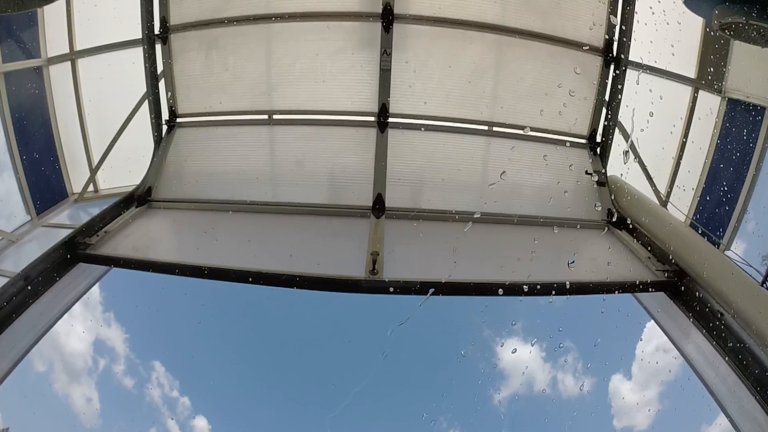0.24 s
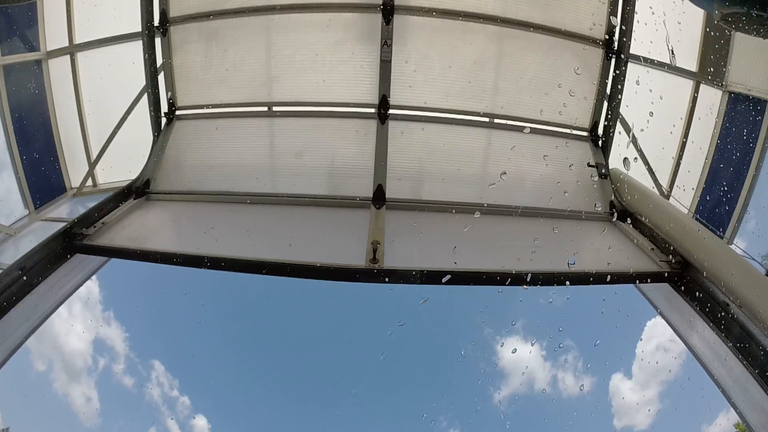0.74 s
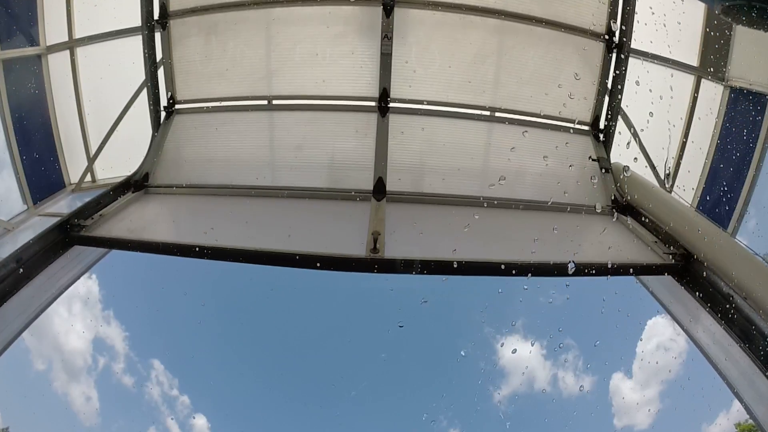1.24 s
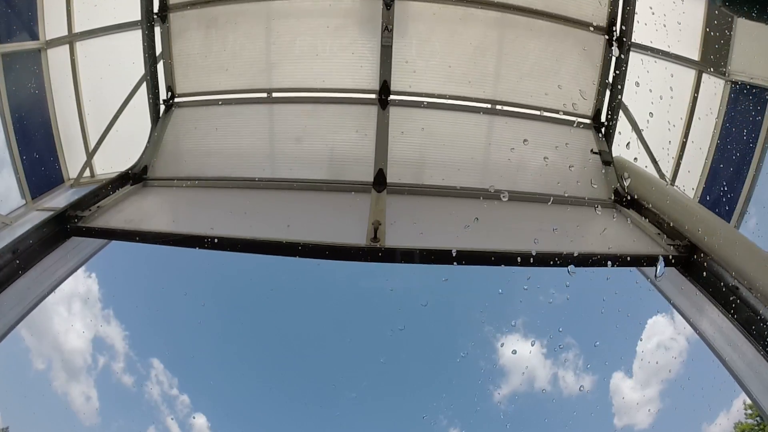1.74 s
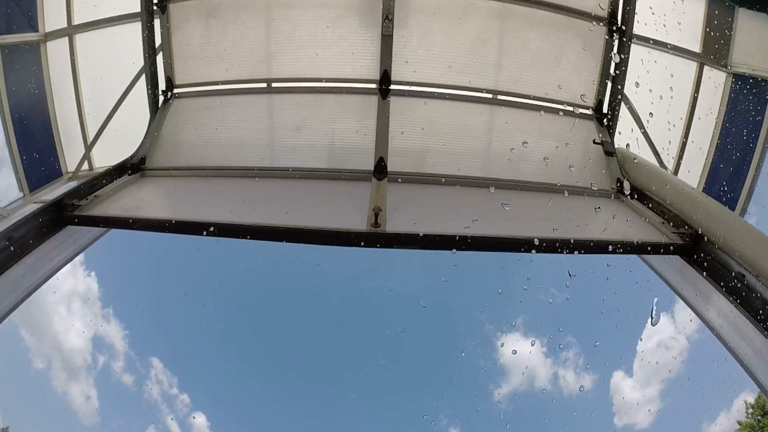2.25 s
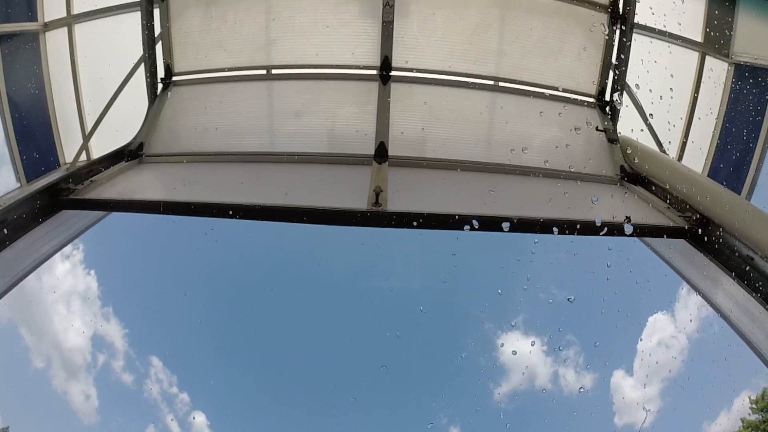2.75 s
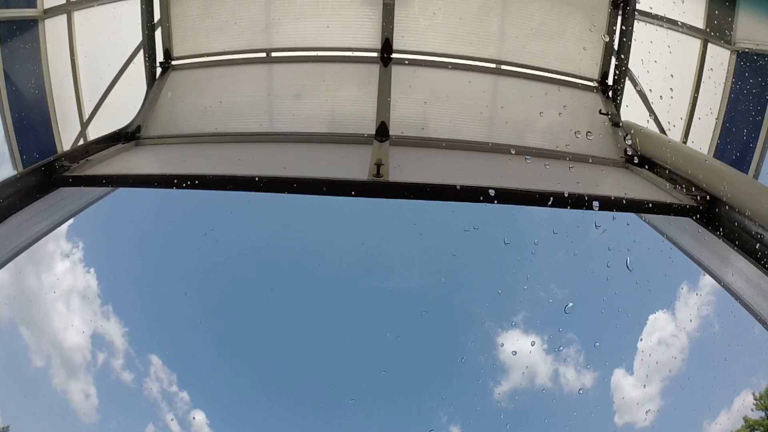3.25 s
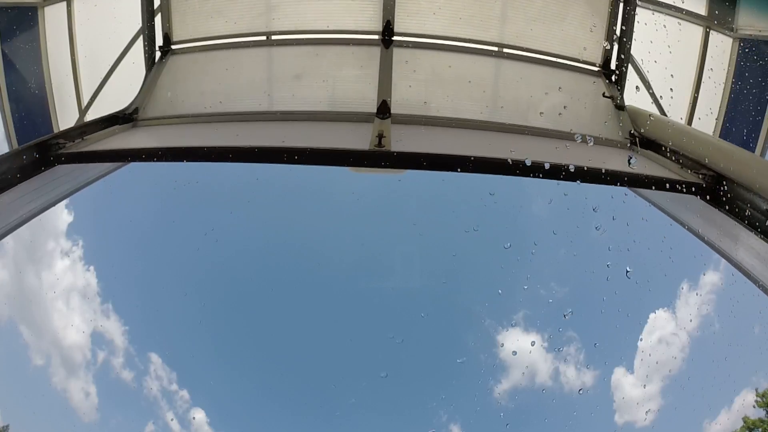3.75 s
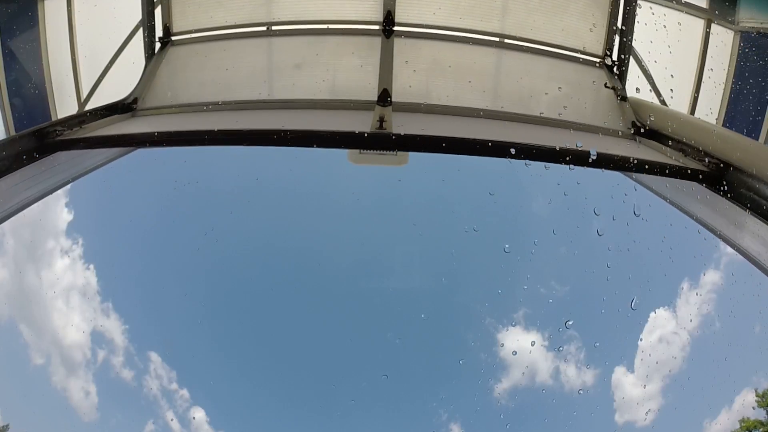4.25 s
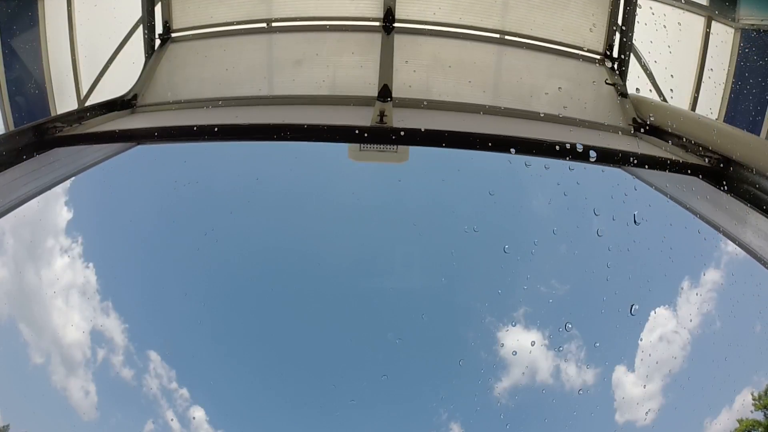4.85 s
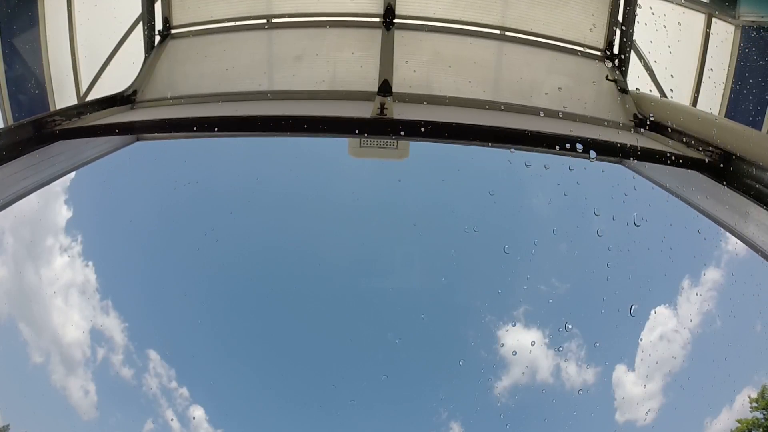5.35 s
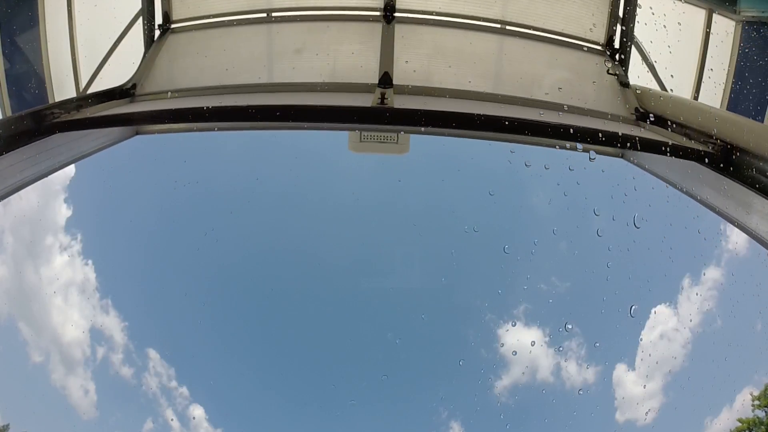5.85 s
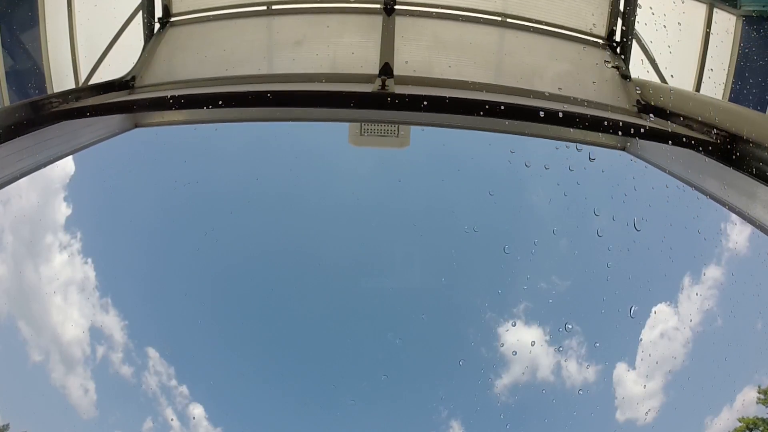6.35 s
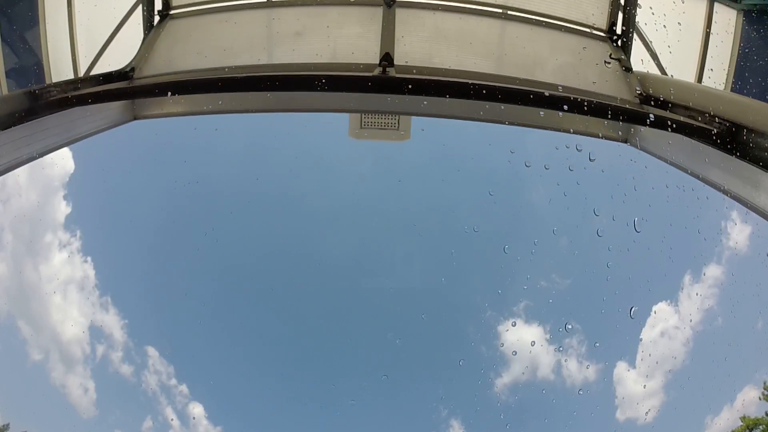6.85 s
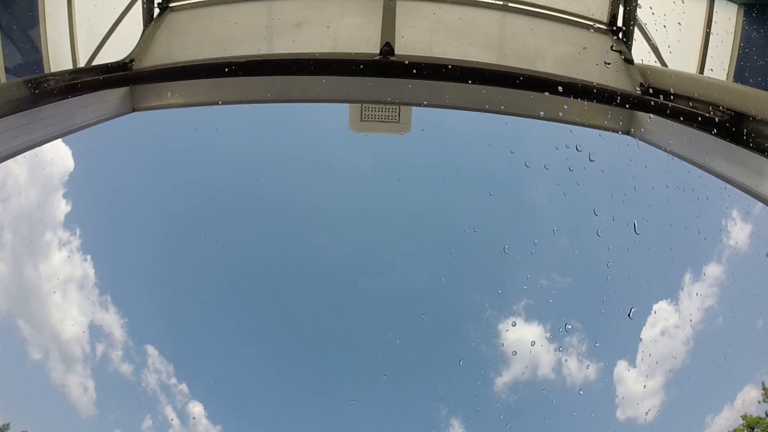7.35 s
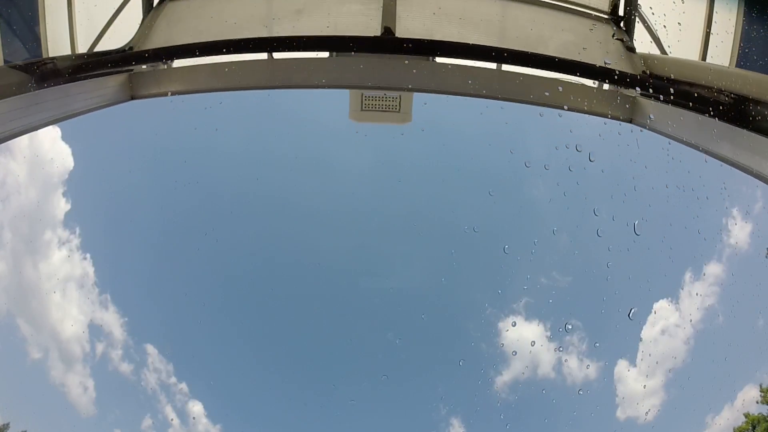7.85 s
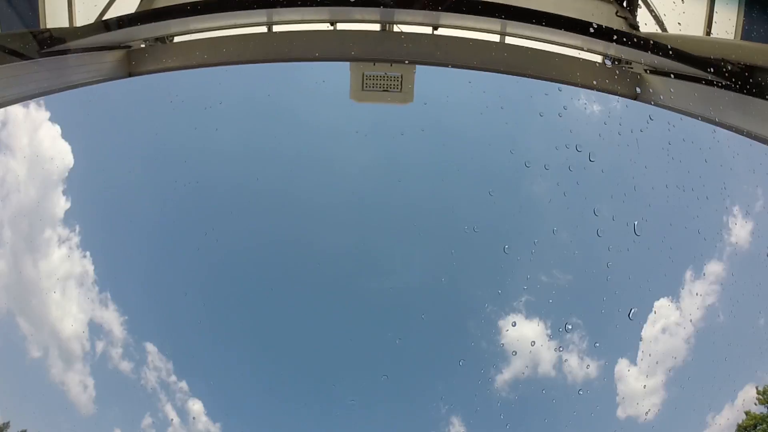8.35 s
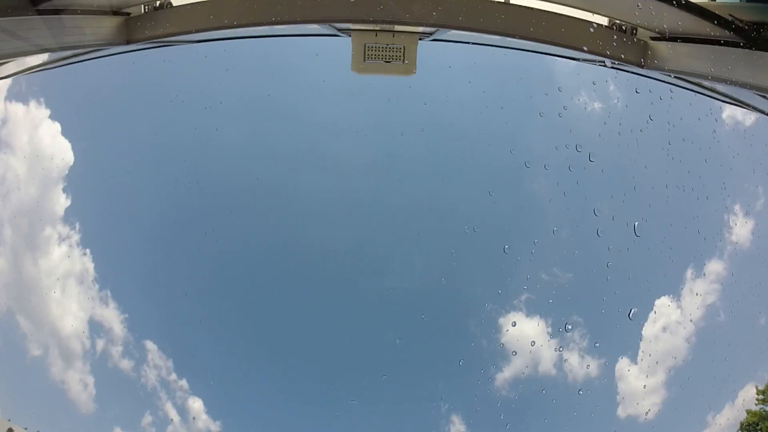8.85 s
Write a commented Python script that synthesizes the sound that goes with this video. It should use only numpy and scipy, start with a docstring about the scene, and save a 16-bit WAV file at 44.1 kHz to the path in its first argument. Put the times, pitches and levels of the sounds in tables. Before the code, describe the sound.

Muffled blower roar with deep cabin booming and a wavering mid-pitched fan hum; near the end the motor cuts, its tone sliding down as the blast fades.

```python
"""Inside a car that creeps out of a car wash under the air dryers, heard by a microphone in the cabin.
The air blast drums on the roof, buffets the body, roars and whistles at the nozzles, hisses over the glass:
shaped noise. The cabin booms on its lowest air modes, as noise ringing in three resonances.
A fan's blade tone, a few shivering partials, swells and fades as the car moves, and its nozzle whistles.
Its motor is cut: the tone sags among tunnel echoes, the blast weakens, and dryers farther off roar on."""
import sys
import numpy as np
from scipy import signal
from scipy.fft import rfft, irfft
from scipy.io import wavfile
from scipy.ndimage import uniform_filter1d

SR = 44100
rng = np.random.default_rng(int(sys.argv[2]) if len(sys.argv) > 2 else 0)


def bounce(signal):
    """Save signal as a 16-bit WAV file at the path given by the first command-line argument."""
    frames = np.transpose(np.atleast_2d(signal))
    limited = np.clip(frames, -1, 1)
    pcm = np.round(limited * 32767).astype(np.int16)
    wavfile.write(sys.argv[1], SR, pcm)


N = 401310
T = np.arange(N) / SR
HZ = np.fft.rfftfreq(N, 1 / SR)

# the near fan turns steadily until its motor is cut; air drag would then halve its speed in COAST_S
BLADE_HZ, CUT_S, COAST_S = 509.2, 6.78, 7.6


def amp(db):
    """Turns decibels into gain."""
    return 10 ** (np.asarray(db) / 20)


def evened(x):
    """Scales to rms 1."""
    return x / np.sqrt(np.mean(abs(x) ** 2) + 1e-30)


def level_curve(points):
    """Joins (time, level) points by straight lines over the whole scene."""
    times_s, levels_db = np.transpose(points)
    return np.interp(T, times_s, levels_db)


def spectrum_db(points):
    """Joins (frequency, dB) points along a log frequency axis; silent above the last point."""
    point_hz, point_db = np.transpose(points)
    return np.interp(np.log(HZ + 1), np.log(point_hz + 1), point_db, right=-np.inf)


def noise(gain):
    """Noise of rms 1 with the given gain at each frequency."""
    white = rng.standard_normal(N)
    return evened(irfft(rfft(white) * gain, N))


def drift(rate_hz):
    """Slow random wandering of rms 1, mostly below rate_hz."""
    return noise(1 / (1 + (HZ / rate_hz) ** 4))


def resonance(hz, width_hz):
    """Noise ringing in one resonance, width_hz across where its amplitude gain is half."""
    return noise(1 / (1 + (2 * (HZ - hz) / width_hz) ** 2))


def steadied(x, seconds):
    """Holds the slow level near 1 and keeps the quick flutter."""
    size = max(int(seconds * SR), 8)
    power = uniform_filter1d(uniform_filter1d(x ** 2, size), size)
    return x / np.sqrt(power + 1e-6)


def fan_speed(t):
    """Share of full speed: 1 while driven, then slowed by air drag."""
    return 1 / (1 + np.maximum(t - CUT_S, 0) / COAST_S)


def blast_level(start_db, db_per_s, swell_db, speed_power, lag_s=0):
    """Level in dB of one part of the blast, from the car's progress and the fan's speed."""
    # the blast swells briefly as the car moves through it; half length is where the swell is 1/e
    swell_s, swell_half_s = 3.34, 0.37
    swell = swell_db * np.exp(-((T - swell_s) / swell_half_s) ** 2)
    progress = db_per_s * np.minimum(T, CUT_S)
    slowing = speed_power * 20 * np.log10(fan_speed(T - lag_s))
    return start_db + progress + swell + slowing


def far_dryers(level_db=-52):
    """Dryers deeper in the tunnel: a steady roar that is left when the near fan runs down."""
    # spectrum of the distant roar: frequency_hz, relative_db (per Hz)
    far_spectrum = [(400, -10.5), (540, 1.5), (680, -0.5), (800, 0), (1000, -5), (1250, -6.5), (1600, -13),
                    (2300, -19), (3000, -32.5)]
    return amp(level_db) * noise(amp(spectrum_db(far_spectrum)))


def hollow_rumble(hz=325, width_hz=135):
    """A broad, hollow band of the buffeting, between the roof's drumming and the blade tone."""
    # level of the rumble: time_s, level_db
    rumble_levels = [(0, -38), (.6, -40.5), (2.0, -38), (2.7, -42), (3.45, -35.5), (4.0, -39), (5.65, -39),
                     (6.0, -41.5), (6.6, -44), (6.95, -37.5), (7.2, -44), (7.5, -42), (7.85, -44),
                     (9.1, -45.5)]
    return amp(level_curve(rumble_levels)) * steadied(resonance(hz, width_hz), seconds=0.27)


def cabin_boom(billow_db=0.3, billow_hz=3.3):
    """Turbulence on the body pumps the lowest air modes of the cabin; each billows on its own."""
    # air modes of the cabin (throb, boom, drone): frequency_hz, width_hz, trim_db
    air_modes = [(28.5, 7.9, 0.15), (70.7, 14, -0.5), (99.7, 11.3, 0)]
    # levels of the three modes before their trims, deepest first: time_s, level_db
    throb_levels = [(0, -47), (.68, -29.5), (.8, -23.5), (1.1, -25), (1.4, -31), (2.05, -28), (2.3, -28),
                    (2.57, -22.5), (2.85, -36), (3.1, -30), (3.3, -31), (3.55, -27.5), (3.8, -34),
                    (4.2, -27), (4.5, -36), (5.25, -30.5), (5.5, -26.5), (5.85, -33.5), (6.6, -33),
                    (6.95, -29.5), (7.8, -27.5), (8.25, -36), (8.7, -30), (9.1, -38)]
    boom_levels = [(0, -23.5), (.28, -30), (.58, -43), (.8, -24.5), (1.1, -29), (1.5, -24.5), (1.8, -26.5),
                   (2.05, -34.5), (2.3, -23.5), (2.53, -33), (2.92, -26.5), (3.2, -28.5), (3.47, -23),
                   (3.9, -35), (4.2, -35), (4.47, -22.5), (4.68, -34.5), (5.1, -22), (5.5, -28),
                   (5.75, -27.5), (6.15, -31), (6.35, -26), (6.5, -46), (6.78, -24), (7.05, -26),
                   (7.42, -24.5), (7.62, -31.5), (7.85, -24), (8.05, -37), (8.3, -32.5), (8.55, -29),
                   (9.1, -34)]
    drone_levels = [(0, -24.5), (.55, -38), (1.0, -28.5), (1.45, -32), (1.8, -28.5), (2.1, -32), (2.8, -26),
                    (3.25, -26.5), (3.7, -23.5), (4.15, -31), (4.75, -33), (5.1, -23), (5.45, -32),
                    (5.8, -25), (6.35, -32), (6.55, -27.5), (7.2, -30.5), (7.55, -41), (8.0, -33.5),
                    (9.1, -56)]
    boom = np.zeros(N)
    for (hz, width_hz, trim_db), points in zip(air_modes, (throb_levels, boom_levels, drone_levels)):
        level_db = level_curve(points) + trim_db + billow_db * drift(billow_hz)
        boom += amp(level_db) * steadied(resonance(hz, width_hz), seconds=0.3)
    return boom


def air_blast(buffet_trim_db=8.0, roar_trim_db=1.0, hiss_trim_db=1.0, gust_db=-0.3, flutter_db=0.26):
    """Jets drum on the roof, buffet the body, roar and whistle at the nozzles, and hiss over the glass."""
    # smooth spectra heard through the closed car: frequency_hz, relative_db (per Hz)
    buffet_spectrum = [(14, -40), (21, -5), (38, 7), (55, 8), (85, 6), (120, -2), (170, -5.5), (225, -3),
                       (250, -5), (280, -10.5), (360, -11.5), (400, -10), (455, -9), (490, -17),
                       (560, -25.5), (900, -57)]
    roar_spectrum = [(200, -8), (450, 1), (530, 3.5), (580, 0.1), (800, -4), (950, 0), (1250, -10),
                     (1800, -10), (2450, -16.2), (3100, -23.5), (5000, -85.5)]
    hiss_spectrum = [(1500, -19.5), (2700, -3), (3400, 3), (4800, -0.5), (5200, -7), (6200, -9),
                     (7200, -15), (9000, -22), (13000, -41.5)]
    # bands that glass and panels let through or hold back: frequency_hz, width_hz (at half the dB), gain_db
    panel_bands = [(767, 67, 4), (1210, 58, -0.5), (1410, 110, 4), (1545, 84, 4.5), (1740, 70, 3),
                   (2100, 70, -2), (2280, 210, 3.5), (2750, 90, 2), (3030, 150, -3.5), (3670, 260, 2),
                   (3980, 150, -1), (4230, 130, 1.5), (4470, 110, -5.5), (4590, 200, 4), (4800, 63, 3.5)]
    # broad modes of the roof panel: frequency_hz, width_hz, gain_db (against the drumming)
    roof_modes = [(141.7, 30, -4), (171.6, 10, -8), (196.4, 26, -9.5), (224, 14, -13.5)]
    # level of the jets' drumming on the roof: time_s, level_db
    drumming_levels = [(0, -31), (.9, -29.5), (1.4, -32), (2, -29), (2.65, -35.5), (3.15, -29.5),
                       (3.8, -29.5), (4.45, -36), (4.8, -31.5), (5.8, -33), (6.05, -36.5), (6.4, -30.5),
                       (7.15, -31), (7.35, -34.5), (7.7, -34.5), (8.3, -44), (8.7, -40), (9.1, -45)]
    # breathy nozzle whistles: frequency_hz, width_hz, gain_db (against the roar before its trim)
    nozzle_whistles = [(1045, 72, -7.5), (1099, 55, -11.5)]
    # course of each part before its trim: start_db, slope_db_per_s, swell_db, power of the fan's speed
    on_body = (-34, -0.18, -0.5, 2.5)
    at_nozzles = (-43.5, -0.2338, 1.2, 3.5)
    on_glass = (-56, -0.46, 0, 1.5)

    buffet_level = blast_level(*on_body)
    hiss_level = blast_level(*on_glass)
    # the jets at the nozzles keep their push for a moment after the cut
    roar_level = blast_level(*at_nozzles, lag_s=0.36)
    panels_db = sum(db * np.exp(-np.log(2) * (2 * (HZ - hz) / width_hz) ** 2)
                    for hz, width_hz, db in panel_bands)

    # one gust pattern moves buffeting and roar in opposite directions
    gusts = drift(rate_hz=11)
    glass_flutter = drift(rate_hz=46)

    roof = amp(level_curve(drumming_levels)) * sum(
        amp(db) * steadied(resonance(hz, width_hz), seconds=0.23) for hz, width_hz, db in roof_modes)
    body = amp(buffet_level + buffet_trim_db + gust_db * gusts) * noise(amp(spectrum_db(buffet_spectrum)))
    roar = amp(roar_level + roar_trim_db + flutter_db * gusts)
    roar = roar * noise(amp(spectrum_db(roar_spectrum) + panels_db))
    whistles = amp(roar_level) * sum(
        amp(db) * steadied(resonance(hz, width_hz), seconds=0.14) for hz, width_hz, db in nozzle_whistles)
    hiss = amp(hiss_level + hiss_trim_db + flutter_db * glass_flutter)
    hiss = hiss * noise(amp(spectrum_db(hiss_spectrum) + panels_db))
    return roof + body + roar + whistles + hiss


def fan_whistle(hz=1038, width_hz=50, wander_hz=10, level_db=-53.5, stall_speed=.925, stall_range=.015):
    """The near fan's nozzle sings a wavering note that falls with the fan and dies as the airflow weakens."""
    # moments when the whistle flares up: time_s, rise_db
    flare_moments = [(.12, 8), (.82, 7), (1.83, 8), (6.23, 12.5)]
    flare_half_s = 0.025  # to where the rise is 1/e
    speed = fan_speed(T)
    phase = 2 * np.pi * np.cumsum(hz * speed + wander_hz * drift(rate_hz=6.88)) / SR
    # two independent slow drifts make the note a narrow, breathy band
    song = drift(width_hz / 2) * np.cos(phase) + drift(width_hz / 2) * np.sin(phase)
    singing = .5 + .5 * np.tanh((speed - stall_speed) / stall_range)
    flare_db = sum(db * np.exp(-((T - s) / flare_half_s) ** 2) for s, db in flare_moments)
    return amp(level_db + flare_db) * singing * steadied(song, seconds=0.072)


def tunnel(x, t60_s, wet_db):
    """The wash tunnel rings on, so a falling tone smears and beats with its own echoes."""
    t = np.arange(2 * SR) / SR
    tail = rng.standard_normal(len(t)) * amp(-60 * t / t60_s)
    echo = signal.fftconvolve(x, tail)[:N]
    return evened(x + amp(wet_db) * steadied(evened(echo), seconds=.4))


def fan(wander_rad=0.12, rough=0.19, echo_share=0.66, apart_hz=25):
    """Blades chop uneven air: a narrow tone whose phase and strength shiver."""
    # partials of the blade tone: multiple, relative_db
    blade_partials = [(1, 0.5), (2, -21.5), (3, -28.5)]
    # the tone swells and fades as the car moves through its standing waves: time_s, level_db
    tone_levels = [(0, -38.5), (.42, -40.5), (.55, -44), (.8, -40.5), (1.22, -49), (1.8, -36.5),
                   (2.02, -39.5), (2.2, -37), (2.34, -44), (2.45, -32.5), (2.6, -33.5), (2.72, -39),
                   (2.92, -33.5), (3.04, -38.5), (3.3, -37), (3.42, -39.5), (3.62, -35), (3.73, -41.5),
                   (3.8, -38), (4.2, -38.5), (4.42, -43), (4.72, -43.5), (4.85, -37), (5.15, -37),
                   (5.3, -49), (5.5, -42), (5.82, -38), (5.97, -52), (6.12, -39), (6.35, -38.5),
                   (6.52, -39), (6.58, -49), (6.66, -39.5), (6.82, -40.5), (7.05, -46), (7.26, -40),
                   (7.5, -40), (8.2, -44), (8.58, -39.5), (8.85, -44), (9.1, -53)]
    blade_hz = BLADE_HZ * fan_speed(T)
    phase = 2 * np.pi * np.cumsum(blade_hz) / SR + wander_rad * drift(rate_hz=4.1)
    tone = evened(sum(amp(db) * np.sin(round(multiple) * phase) * (1 + rough * drift(rate_hz=10.0))
                      for multiple, db in blade_partials))
    # echoes stand apart from the direct tone only once the pitch has moved
    pitch_fall = np.minimum((BLADE_HZ - blade_hz) / apart_hz, 1)
    wet = np.clip(echo_share * pitch_fall, 0, 1)
    heard = np.sqrt(1 - wet) * tone + np.sqrt(wet) * tunnel(tone, t60_s=2.6, wet_db=14)
    return amp(level_curve(tone_levels)) * steadied(heard, seconds=0.2)


def scene():
    """Everything as heard in the cabin, on one channel."""
    background = far_dryers() + hollow_rumble() + cabin_boom()
    return (background + air_blast() + fan_whistle() + fan())[None]


def record(dry):
    """The microphone adds its own hiss; then a low-pass limits the band."""
    # the microphone's own hiss: frequency_hz, relative_db (per Hz)
    hiss_of_mic = [(1000, 0), (8000, 0), (10000, -1.5), (12000, -4.5), (14000, -9), (15200, -16)]
    edge_hz = 15200
    own_hiss = amp(-72.5) * noise(amp(spectrum_db(hiss_of_mic)))
    low_pass = signal.firwin(511, edge_hz, window=("kaiser", 9), fs=SR)
    return signal.oaconvolve(dry + own_hiss, low_pass[None], "same")


dry = scene()
out = record(dry)
bounce(out)
```